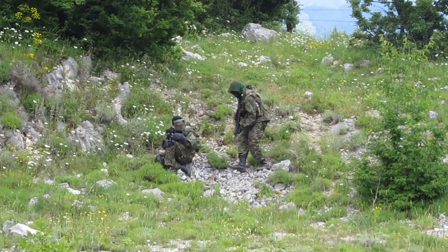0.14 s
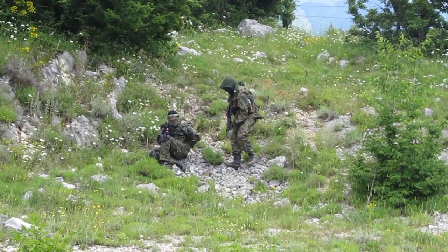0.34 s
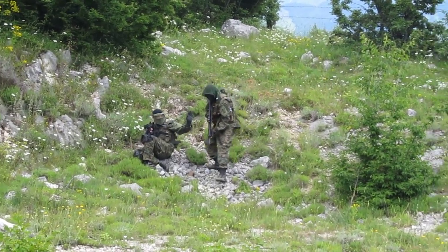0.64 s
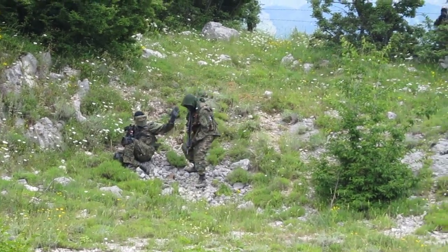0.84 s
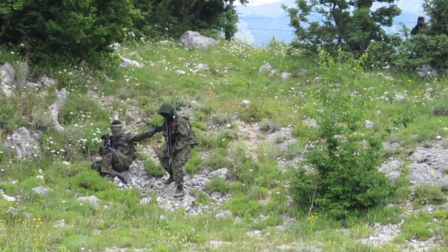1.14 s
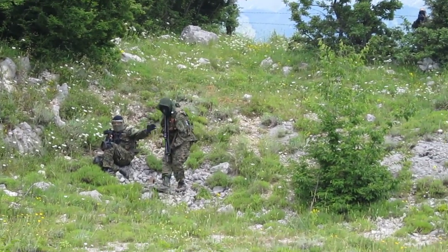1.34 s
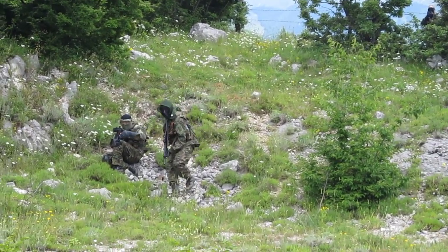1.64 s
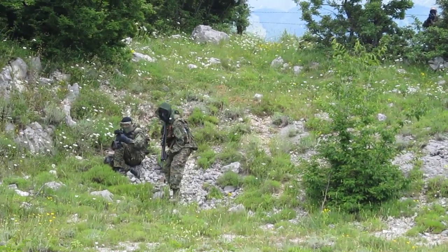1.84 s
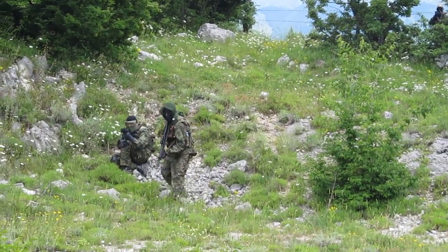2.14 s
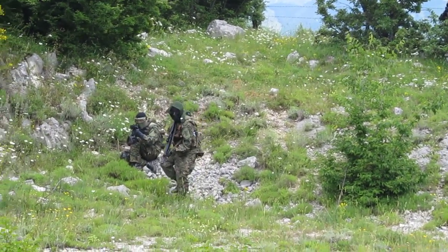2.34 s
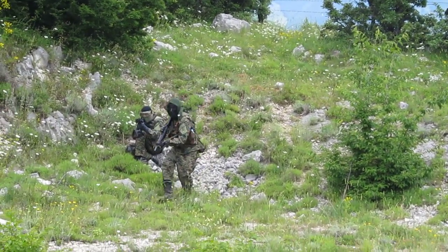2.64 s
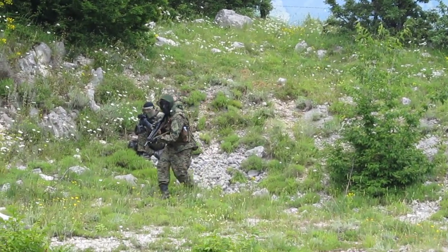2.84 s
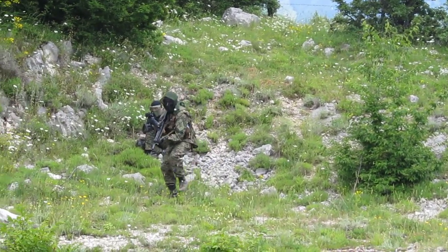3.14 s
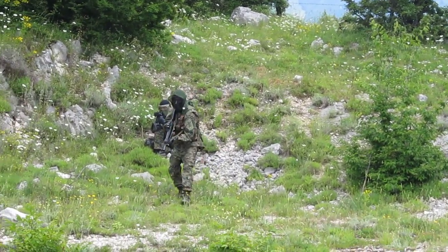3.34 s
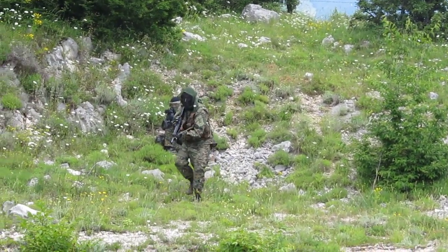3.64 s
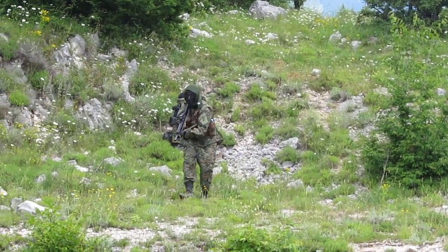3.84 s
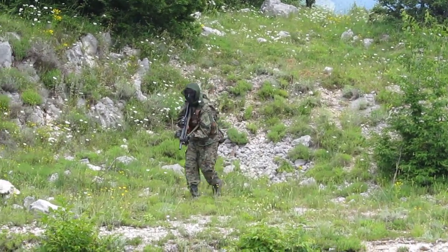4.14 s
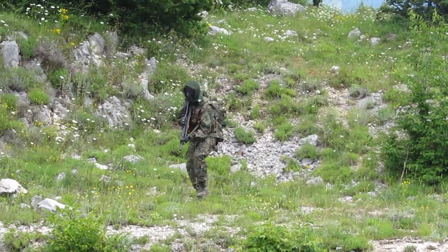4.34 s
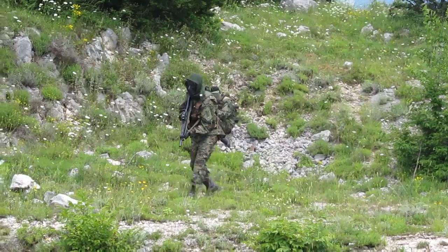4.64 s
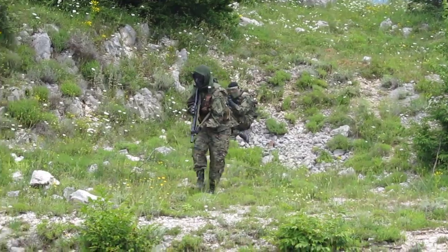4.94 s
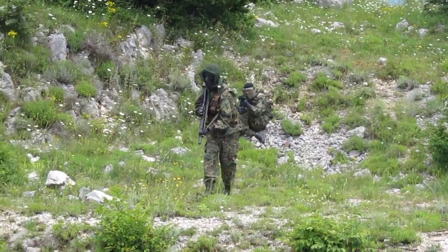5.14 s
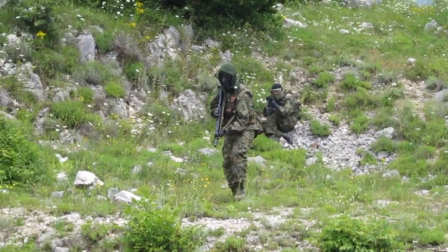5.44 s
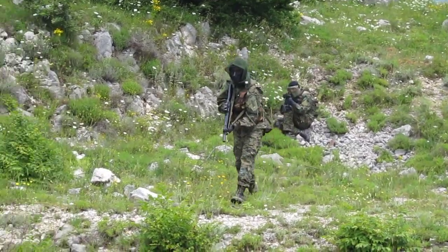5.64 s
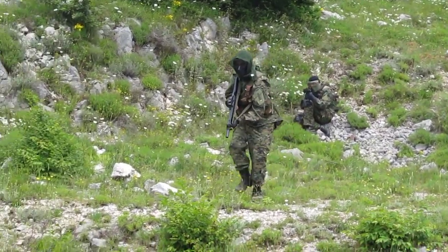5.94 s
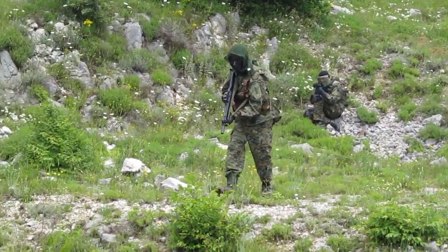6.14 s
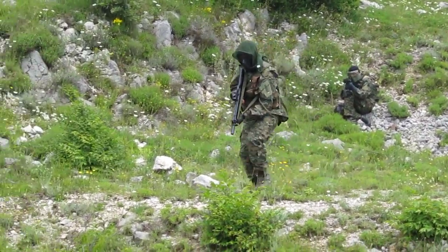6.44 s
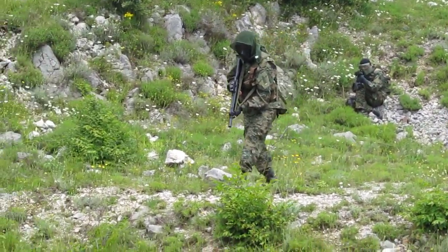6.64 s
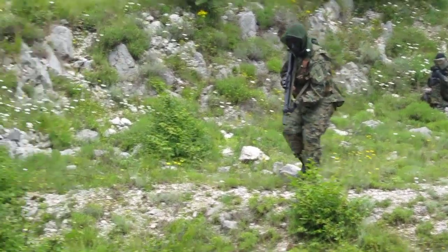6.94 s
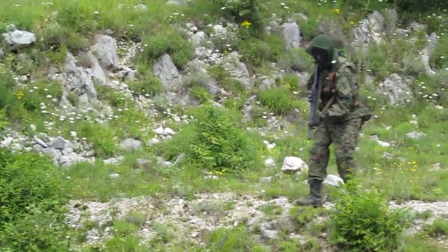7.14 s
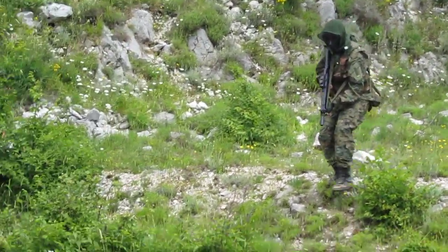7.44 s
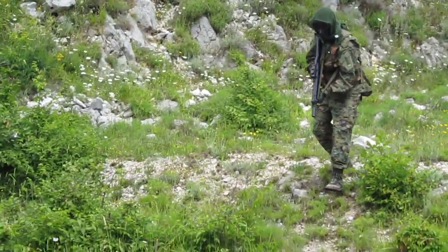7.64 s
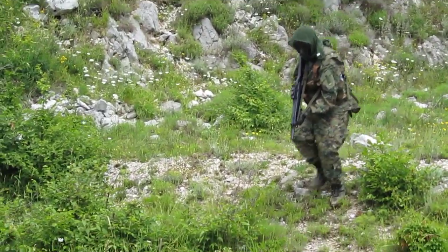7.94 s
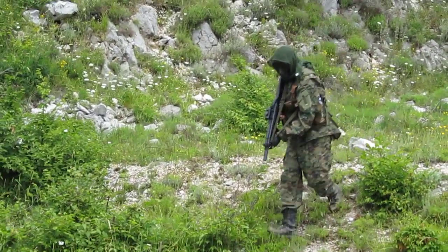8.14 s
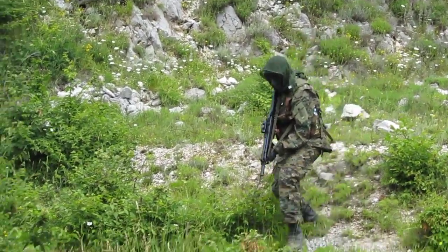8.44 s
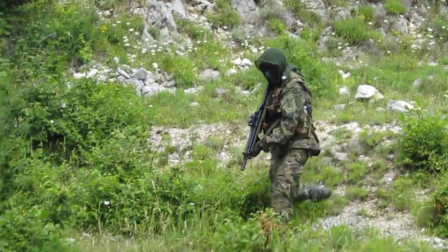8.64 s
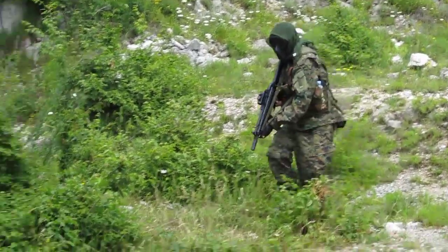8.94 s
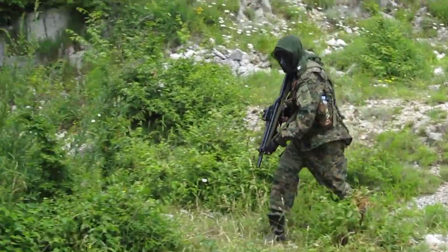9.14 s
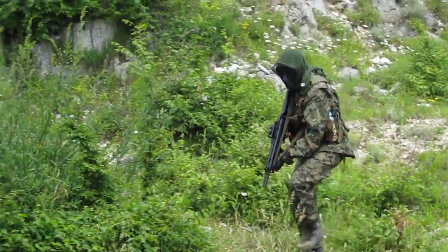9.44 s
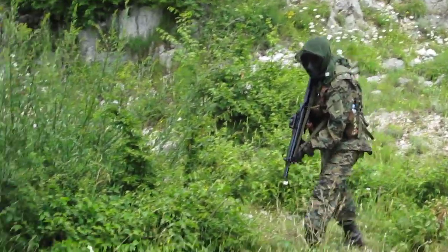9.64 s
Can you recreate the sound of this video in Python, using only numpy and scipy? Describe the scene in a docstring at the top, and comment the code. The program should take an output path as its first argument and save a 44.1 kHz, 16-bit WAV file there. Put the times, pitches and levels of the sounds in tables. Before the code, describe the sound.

Quiet outdoor walk downhill: scree crunches and ticks, soft grassy steps, then rustling undergrowth and sharp breaking sticks, with a faint steady high whine.

```python
"""Someone walks down an open hillside: first over loose limestone scree, then through tall grass.
At first boots slide in gravel, and stones or loose kit knock; enveloped grain noise and struck resonances make these.
Grass then swishes, stems tick and heels thud on soil; towards the end the growth rustles louder and dry sticks snap.
Throughout lie quiet outdoor air (coloured noise) and a thin motor whine (wavering sines over resonant hiss)."""
import sys
import numpy as np
from scipy import signal
from scipy.fft import rfft, irfft
from scipy.io import wavfile

SR = 44100
rng = np.random.default_rng(int(sys.argv[2]) if len(sys.argv) > 2 else 0)


def unload_wav(signal):
    """Save mono or channel-first audio to the path in sys.argv[1] as 16-bit WAV at rate SR, clipped to [-1, 1]."""
    wavfile.write(
        sys.argv[1],
        SR,
        np.round(np.clip(np.atleast_2d(signal).T, -1, 1) * 32767).astype(np.int16),
    )


N = 432160
TIME = np.arange(N) / SR

# soil under a sole: freq_hz, density_db_per_hz (relative)
SOIL_COLOUR = [(40, -30), (130, -3.5), (230, -2), (520, -1), (850, -0.5), (1500, -10.5), (4000, -38),
               (12000, -59)]
# dry brush, also the grit of knocks: freq_hz, density_db_per_hz (relative)
BRUSH_COLOUR = [(60, -39), (250, -16.5), (550, -2.5), (950, 1), (1600, 1.5), (2300, -4.5), (3900, -5.5),
                (5200, -9), (6600, -6), (8500, -19), (12000, -26), (17000, -60)]
# splinters of stems and sticks: freq_hz, density_db_per_hz (relative)
SPLINTER_COLOUR = [(60, -14), (400, -8), (1500, -5), (4000, 0), (7000, 0), (10500, -8), (17000, -21)]


def gain_of(db):
    """Decibels to amplitude."""
    return 10 ** (np.asarray(db) / 20)


def evened(x):
    """Scales to rms 1."""
    return x / np.sqrt(np.mean(x ** 2) + 1e-20)


def peaked(x):
    """Scales to peak 1."""
    return x / (abs(x).max() + 1e-20)


def read(points, hz):
    """Reads a table on a log-frequency axis."""
    f, value = np.transpose(points)
    return np.interp(np.log(hz + 1), np.log(f + 1), value)


def add(mix, start_s, sound):
    """Mixes a sound in at start_s."""
    part = mix[max(round(start_s * SR), 0):][:len(sound)]
    part += sound[:len(part)]


def drift(hz):
    """Slow random curve of rms 1, with rates up to about hz."""
    f = np.fft.rfftfreq(N, 1 / SR)
    spectrum = rfft(rng.standard_normal(N)) * np.exp(-(f / hz) ** 2)
    return evened(irfft(spectrum, N))


def colour(x, points, size=2048):
    """Minimum-phase filter with the given spectrum: causal, so clicks keep their sharp front."""
    hz = abs(np.fft.fftfreq(size, 1 / SR))
    log_gain = np.log(gain_of(read(points, hz)))
    taps = np.fft.ifft(np.exp(np.conj(signal.hilbert(log_gain)))).real
    return signal.oaconvolve(x, taps)[:len(x)]


def resonate(x, hz, width_hz):
    """One band-pass resonance of gain 1."""
    hz = min(hz, SR / 2 - 1000)
    b, a = signal.iirpeak(hz, hz / min(width_hz, SR / 4), fs=SR)
    return signal.lfilter(b, a, x)


def burst(t, fall_s):
    """A short spray of tiny fractures: exponentially dying noise."""
    return rng.standard_normal(len(t)) * np.exp(-t / fall_s)


def background(air_db=-49.5, swell_db=.5, waver_hz=2, flutter_db=1.3):
    """Outdoor air, fuzzy housing resonances stirred by a motor, and the motor's wavering whine."""
    # still air and motor hiss: freq_hz, density_db_per_hz (relative)
    air_colour = [(20, -1), (50, -1), (105, 0.5), (190, -2), (420, -4.5), (850, 1), (1100, 0), (1550, -5),
                  (2100, 1), (3200, -9), (4500, -11), (8000, -15), (12000, -17.5), (17000, -25)]
    # housing resonances: freq_hz, width_hz (each of two passes), rms_db
    housing_modes = [(1241.5, 106, -55.5), (2282, 176, -55.5), (2490, 250, -57), (2774, 140, -61.5),
                     (3417, 370, -61), (8000, 510, -75)]
    # motor whine: freq_hz, rms_db
    whine_tones = [(2438, -58.5), (2468, -58), (5572, -72.5), (7854, -70.5), (15625, -88)]
    air = evened(colour(rng.standard_normal(N), air_colour))
    out = gain_of(air_db + swell_db * drift(26)) * air
    for hz, width_hz, db in housing_modes:
        once = resonate(rng.standard_normal(N), hz, width_hz)
        out += gain_of(db) * evened(resonate(once, hz, width_hz))
    for hz, db in whine_tones:
        turns = np.cumsum(hz + waver_hz * drift(8.6)) / SR
        tone = np.sin(2 * np.pi * turns) * gain_of(flutter_db * drift(13))
        out += gain_of(db) * evened(tone)
    return out


def hillside(x, delay_s=0.015):
    """Rocks and bushes scatter a soft, slightly late echo: a noise tail decaying per band."""
    # scatter from the slope: freq_hz, t60_s
    slope_t60 = [(100, 0.51), (1000, 0.47), (5000, 0.47), (16000, 0.25)]
    hz, t, z = signal.stft(rng.standard_normal(SR // 2), SR, nperseg=256)
    decay = np.exp(-np.log(1000) * t / read(slope_t60, hz)[:, None])
    onset = 1 - np.exp(-t / delay_s)
    tail = signal.istft(z * decay * onset, SR, nperseg=256)[1]
    return signal.oaconvolve(x, tail / np.linalg.norm(tail))[:N]


def thumps(push_s=0.0017, crumble_s=0.013, crumble_db=-4):
    """The heel gives the soil one dull push, and the earth crumbles under it."""
    # heels on soil: start_s, push_peak_db, pitch_hz
    thump_rows = [(1.535, -37, 190), (2.555, -41.5, 290), (6.557, -42, 325), (6.655, -34.5, 300),
                  (7.043, -29, 240), (7.989, -35, 236), (8.293, -32, 191), (8.642, -22.5, 510),
                  (8.655, -27, 398), (8.781, -32, 205)]
    out, t = np.zeros(N), TIME[:SR // 8]
    for s, db, hz in thump_rows:
        push = np.sin(2 * np.pi * hz * t) * t * np.exp(-t / push_s)
        crumble = resonate(colour(burst(t, crumble_s), SOIL_COLOUR), hz, 2 * hz)
        add(out, s, gain_of(db) * (peaked(push) + gain_of(crumble_db) * peaked(crumble)))
    return out


def ticks(rise_s=0.00044, crack_s=0.001, tail_db=-18, tail_s=0.0069,
          relative_width=0.16, splinter_db=-6, splinter_width=1.1):
    """A dry stem or chip of stone gives way: a bright, damped ring and a wide crack, with a short trail."""
    # stems and chips: start_s, peak_db, ring_hz
    tick_rows = [(.3737, -23, 3100), (0.427, -23, 2750), (.703, -11, 5170), (.7114, -24, 3560),
                 (.8106, -35, 3060), (.7694, -28, 11500), (.8685, -26, 3200), (.974, -25.5, 2600),
                 (0.982, -31, 3000), (1.1318, -34, 3510), (1.468, -20, 5340), (1.5318, -25, 3300),
                 (1.5375, -18.5, 3400), (2.1958, -20, 6460), (2.4614, -25, 3480), (2.6439, -33.5, 3430),
                 (2.8944, -21, 8450), (3.015, -35.5, 3530), (3.4, -32, 7500), (4.3979, -18, 10600),
                 (4.615, -29.5, 8040), (5.217, -30, 7930), (5.48, -33, 10600), (6.2497, -30, 13000),
                 (6.6816, -26, 3240), (7.049, -27.5, 3700), (7.0503, -29.5, 8300), (7.0803, -28.5, 7760),
                 (7.099, -29, 2630), (7.216, -25.5, 12900), (7.4498, -29.5, 6300), (7.8735, -31.5, 3490),
                 (7.9583, -32, 3890), (8.1933, -26, 6230), (8.3572, -20, 6700), (9.1797, -21.5, 4430),
                 (9.2434, -24, 3120), (9.5723, -17, 5870), (9.638, -22.5, 5790), (9.7068, -28, 7450)]
    out, t = np.zeros(N), TIME[:SR // 16]
    for s, db, hz in tick_rows:
        crack = burst(t, crack_s) + gain_of(tail_db) * burst(t, tail_s)
        crack *= 1 - np.exp(-t / rise_s)
        ring = resonate(crack, hz, relative_width * hz)
        # small things radiate little bass
        splinters = resonate(colour(crack, SPLINTER_COLOUR), hz, splinter_width * hz)
        tick = peaked(ring) + gain_of(splinter_db) * peaked(splinters)
        add(out, s, gain_of(db) * peaked(tick))
    return out


def snaps(attack_s=0.0001, crack_s=0.0031, tail_db=-14, tail_s=0.022):
    """A stick breaks, fibre after fibre: strong, heavily damped swings and a spray of splinters."""
    # breaking fibres: start_s, ring_peak_db, ring_hz, ring_t60_s, splinter_db (relative to ring)
    snap_rows = [(6.2262, -24, 1700, .012, -4), (7.9893, -13, 1320, .012, -10),
                 (8.7792, -8, 850, .012, -22), (8.7809, -7, 9700, .005, -5), (8.782, -16, 1900, .014, -6),
                 (9.3922, -22, 3400, .02, 6), (9.4068, -2, 1350, .012, -9), (9.407, -1, 3150, .012, -4),
                 (9.409, -6, 3600, .02, -2)]
    out, t = np.zeros(N), TIME[:SR // 16]
    for s, db, hz, t60_s, splinter_db in snap_rows:
        swing = np.sin(2 * np.pi * hz * t) * np.exp(-np.log(1000) * t / t60_s)
        swing *= 1 - np.exp(-t / attack_s)
        spray = burst(t, crack_s) + gain_of(tail_db) * burst(t, tail_s)
        splinters = colour(spray, SPLINTER_COLOUR)
        snap = peaked(np.gradient(swing)) + gain_of(splinter_db) * peaked(splinters)
        add(out, s, gain_of(db) * snap)
    return out


def knocks(t60_s=0.02, chatter=0.46, chatter_s=0.0057, grit_db=-14,
           overtone=1.45, overtone_db=-9, skirt=1.9):
    """A stone or loose piece of kit knocks and chatters, ringing briefly with two hollow modes."""
    # knocking stones and loose kit: start_s, ring_peak_db, ring_hz
    knock_rows = [(.372, -27.5, 1100), (.637, -34, 790), (.667, -29.5, 856), (.693, -30, 820),
                  (.869, -30.5, 690), (1.553, -28, 1350), (1.568, -29, 790), (1.61, -27, 1170),
                  (1.712, -28.5, 883), (2.074, -28, 925), (2.462, -25, 590), (2.464, -32, 1170),
                  (2.481, -31.5, 530), (2.557, -30.5, 646), (2.806, -29.5, 704), (2.834, -36.5, 1180),
                  (2.895, -36.5, 650), (3.945, -36, 705), (4.195, -35.5, 610), (5.19, -39.5, 549),
                  (5.292, -32.5, 830), (6.023, -35, 800), (6.098, -36, 794), (6.283, -29.5, 1140),
                  (6.388, -34, 834), (6.414, -34.5, 848), (6.682, -29.5, 1340), (6.849, -32.5, 855),
                  (7.199, -31.5, 1200), (7.336, -33.5, 860), (7.579, -31.5, 835), (8.021, -27.5, 1840),
                  (8.113, -26.5, 920), (8.193, -23.5, 560), (8.208, -31, 504), (8.271, -23, 1300),
                  (8.321, -24, 860), (8.339, -25.5, 860), (8.615, -27, 890), (8.809, -22, 1850),
                  (8.829, -27, 740), (8.877, -26.5, 861), (8.91, -28, 1320), (9.051, -25.5, 1050),
                  (9.178, -30, 1380), (9.243, -23.5, 890), (9.637, -28, 1530)]
    out, t = np.zeros(N), TIME[:SR // 8]
    width_hz = np.log(1000) / np.pi / t60_s
    for s, db, hz in knock_rows:
        contact = (t == 0) + chatter * burst(t, chatter_s)
        low_mode = peaked(resonate(contact, hz, width_hz))
        high_mode = peaked(resonate(contact, overtone * hz, 2 * width_hz))
        ring = resonate(low_mode + gain_of(overtone_db) * high_mode, hz, skirt * hz)
        grit = colour(contact, BRUSH_COLOUR)
        add(out, s, gain_of(db) * (peaked(ring) + gain_of(grit_db) * peaked(grit)))
    return out


def swells(rows, rise_share):
    """Power of strokes (peak_s, length_s, level_db): each builds in a share of its length, dies over it."""
    power = np.zeros(N)
    for s, length_s, db in rows:
        first = max(int((s - 4 * rise_share * length_s) * SR), 0)
        near = slice(first, int((s + 4 * length_s) * SR))
        t = (TIME[near] - s) / length_s
        envelope = np.exp(-np.maximum(-t / rise_share, t) ** 1.5)
        power[near] += (gain_of(db) * envelope) ** 2
    return power


def walk(slip_rise_s=.0025, slip_fall_s=0.011, slide_soil_db=-15.5, wading_brush_db=0, wading_soil_db=-6):
    """The power that slides, slips, footfalls, leg swings and wading put into gravel, grass, brush and soil."""
    # boot sliding in loose gravel: peak_s, length_s, level_db
    slide_rows = [(.005, 0.049, -39.5), (.385, 0.11, -33), (.745, 0.089, -31.5), (1.543, 0.02, -32),
                  (2.468, 0.035, -47), (6.69, 0.038, -44), (9.44, 0.031, -24)]
    # a few stones slipping and settling: peak_s, level_db
    slip_rows = [(0.532, -31.5), (0.676, -32.5), (.713, -30), (0.87, -30.5), (0.914, -36), (.955, -41),
                 (.976, -34.5), (1.017, -41.5), (1.537, -31), (1.605, -34), (4.196, -46.5), (6.768, -47),
                 (7.198, -46), (7.279, -38.5), (8.34, -35), (8.619, -32), (8.919, -33.5), (9.575, -40),
                 (9.638, -39)]
    # footfalls on turf: full_weight_s, length_s, pressed_soil_db, crushed_brush_db
    step_rows = [(1.553, 0.044, -41, -51), (2.825, 0.07, -51.5, -65), (4.953, .07, -50, -45.5),
                 (6.244, .085, -48, -47), (6.55, .03, -45.5, -54), (6.657, .035, -44, -58),
                 (7.055, 0.12, -50.5, -54), (7.205, 0.1, -51.5, -45.5), (7.606, 0.042, -46.5, -48),
                 (8.001, 0.046, -43, -40.5), (8.209, 0.016, -38, -38), (8.275, 0.084, -46, -40),
                 (8.672, 0.036, -37.5, -43), (8.8, 0.046, -37.5, -31), (9.252, .025, -59, -35.5),
                 (9.457, 0.054, -44, -20.5)]
    # leg swinging through grass: peak_s, length_s, level_db
    swing_rows = [(.39, 0.13, -40.5), (.74, 0.11, -39.5), (1.55, 0.14, -51), (1.98, 0.18, -51.5),
                  (2.16, .07, -49), (2.51, 0.093, -45), (2.76, 0.13, -45.5), (3.02, .035, -50),
                  (3.99, 0.056, -49.5), (4.37, .07, -51.5), (4.64, 0.1, -50), (4.96, .065, -47),
                  (5.22, .025, -47), (5.49, 0.07, -51), (6.15, 0.17, -53.5), (6.68, 0.16, -47.5),
                  (7.08, 0.057, -54), (7.22, .05, -48), (8.26, 0.048, -29), (8.79, 0.059, -35.5),
                  (9.128, .011, -30.5), (9.22, 0.11, -42.5)]
    # steady rustle of growth round the legs: time_s, level_db
    wading_points = [(0, -65), (5.8, -60.5), (7.4, -56), (7.85, -51.5), (8.1, -55), (8.7, -43.5),
                     (9.0, -48), (9.35, -55), (9.6, -47.5), (9.8, -50)]
    slips = [(s, slip_fall_s, db) for s, db in slip_rows]
    on_gravel = swells(slide_rows, 0.41) + swells(slips, slip_rise_s / slip_fall_s)
    pressed = swells([(s, length_s, db) for s, length_s, db, _ in step_rows], 0.29)
    crushed = swells([(s, length_s, db) for s, length_s, _, db in step_rows], 0.29)
    wading = gain_of(np.interp(TIME, *np.transpose(wading_points))) ** 2
    on_grass = swells(swing_rows, 0.91) + wading  # a swing builds almost as slowly as it dies
    on_brush = crushed + gain_of(wading_brush_db) ** 2 * wading
    on_soil = pressed + gain_of(slide_soil_db) ** 2 * on_gravel + gain_of(wading_soil_db) ** 2 * wading
    return on_gravel, on_grass, on_brush, on_soil


def strokes(power, points, grains_per_s, spread_db, rub, clump_db, clump_hz):
    """A stroke sets off clumps of tiny impacts of very unequal size over a smooth rubbing."""
    sizes = gain_of(spread_db * np.minimum(rng.exponential(1, N), 4))
    hits = rng.random(N) < grains_per_s / SR
    grains = sizes * rng.choice([-1, 1], N) * hits
    drive = evened(grains) + rub * rng.standard_normal(N)
    drive *= gain_of(clump_db * drift(clump_hz))
    return np.sqrt(power) * evened(colour(drive, points))


def ground(pebbles_db=-6):
    """Gravel crunches, grass swishes, dry brush crackles; the sole presses soil and stirs pebbles in it."""
    # each: freq_hz, density_db_per_hz (relative)
    gravel_colour = [(60, -30), (250, -7), (650, -4), (1300, 1), (1850, -7.5), (2600, 7.5), (3350, 7.5),
                     (4400, -5), (5400, -0.5), (7500, -11.5), (11000, -16), (17000, -30)]
    grass_colour = [(100, -32.5), (700, 9.5), (2000, -4), (3500, 2), (5500, -1.5), (8000, 2.5), (10000, -2),
                    (13000, -2), (15000, -11), (17000, -19)]
    pebble_colour = [(200, -41), (550, -8), (850, -2), (1200, 10), (2200, -16), (8000, -43)]
    on_gravel, on_grass, on_brush, on_soil = walk()
    gravel = strokes(on_gravel, gravel_colour, grains_per_s=1600, spread_db=4.2, rub=.4,
                     clump_db=2.5, clump_hz=130)
    grass = strokes(on_grass, grass_colour, grains_per_s=3600, spread_db=8.0, rub=1,
                    clump_db=3.0, clump_hz=70)
    brush = strokes(on_brush, BRUSH_COLOUR, grains_per_s=2500, spread_db=3, rub=.6,
                    clump_db=1.4, clump_hz=200)
    soil = strokes(on_soil, SOIL_COLOUR, grains_per_s=700, spread_db=2.0, rub=0.78,
                   clump_db=-3.5, clump_hz=80)
    pebbles = strokes(on_soil, pebble_colour, grains_per_s=90, spread_db=2, rub=0,
                      clump_db=0, clump_hz=80)
    return gravel + grass + brush + soil + gain_of(pebbles_db) * pebbles


def scene():
    """The walk, its echo from the slope, and the background."""
    steps = ground() + knocks() + thumps()
    stems = ticks()
    sticks = snaps()
    echo = hillside(gain_of(-13) * steps + gain_of(-14) * stems + gain_of(-13) * sticks)
    return (steps + stems + sticks + echo + background())[None]


def record(dry, edge_hz=17250):
    """Clips at full scale, then low-passes at edge_hz."""
    clipped = np.clip(dry, -1, 1)
    taps = signal.firwin(511, edge_hz, window=("kaiser", 9), fs=SR)
    return signal.oaconvolve(clipped, taps[None], "same")


dry = scene()
out = record(dry)
unload_wav(out)
```